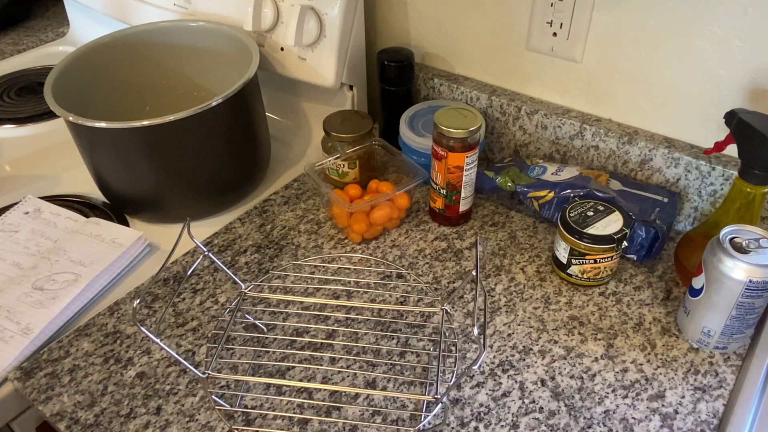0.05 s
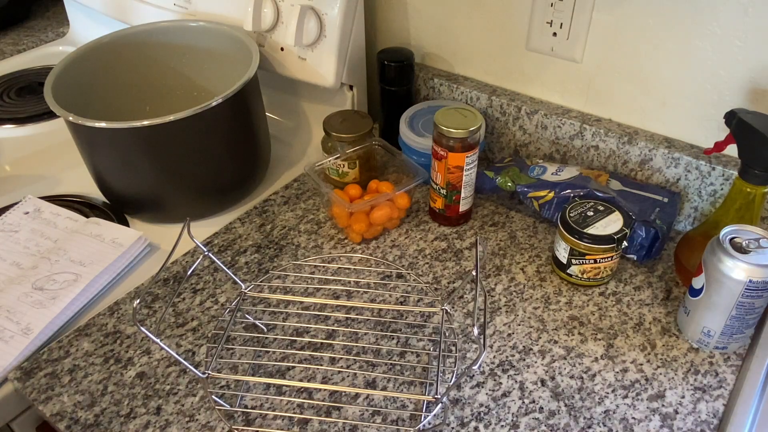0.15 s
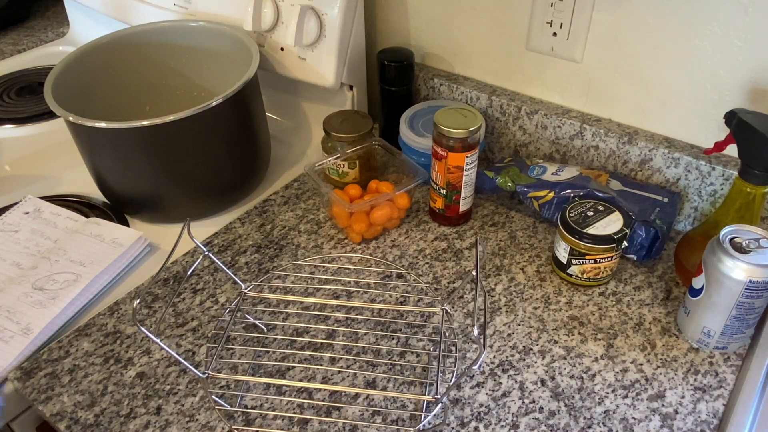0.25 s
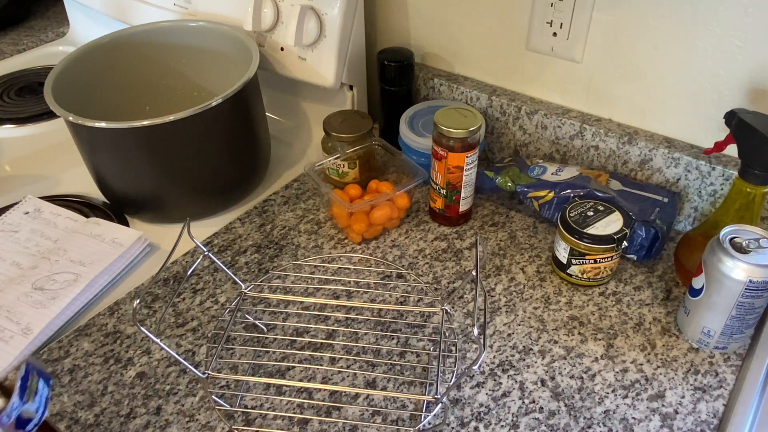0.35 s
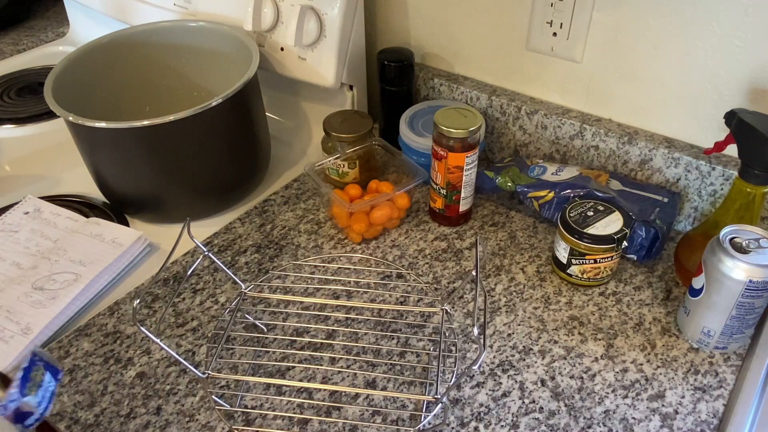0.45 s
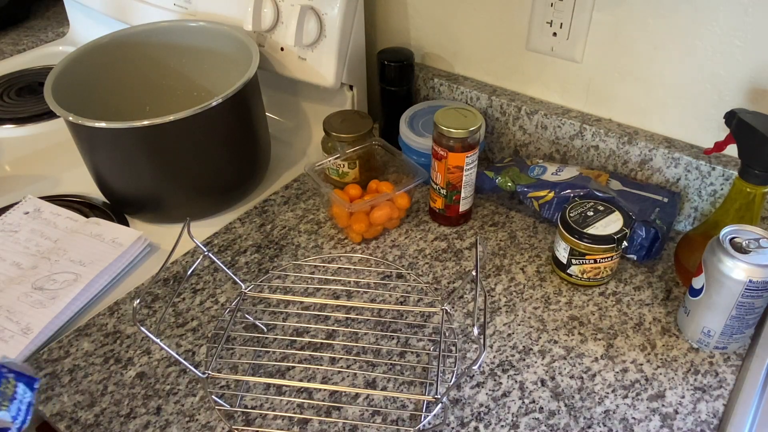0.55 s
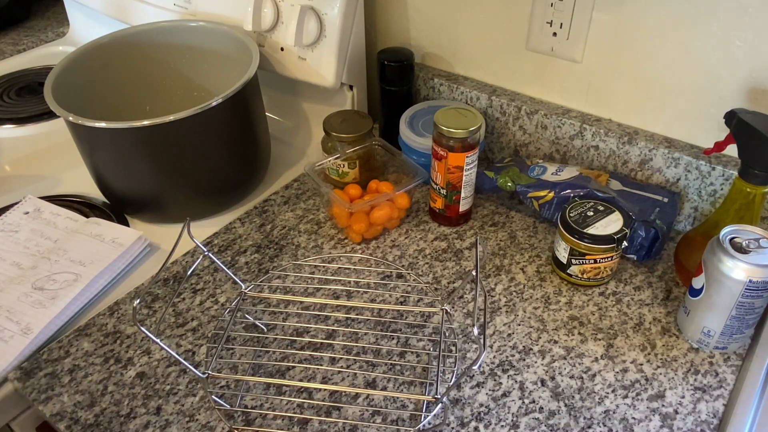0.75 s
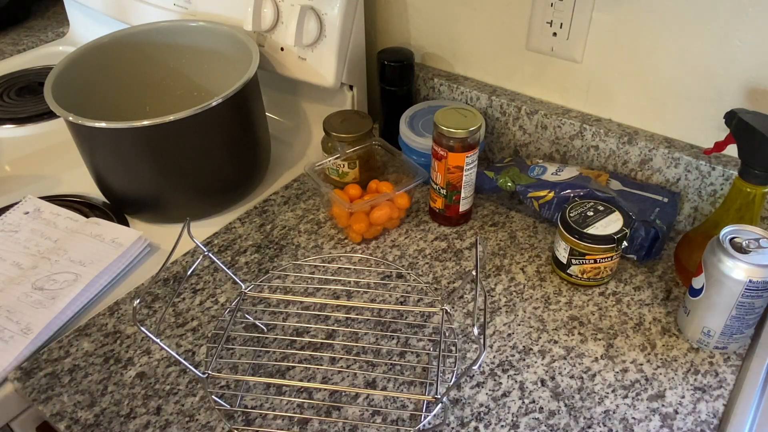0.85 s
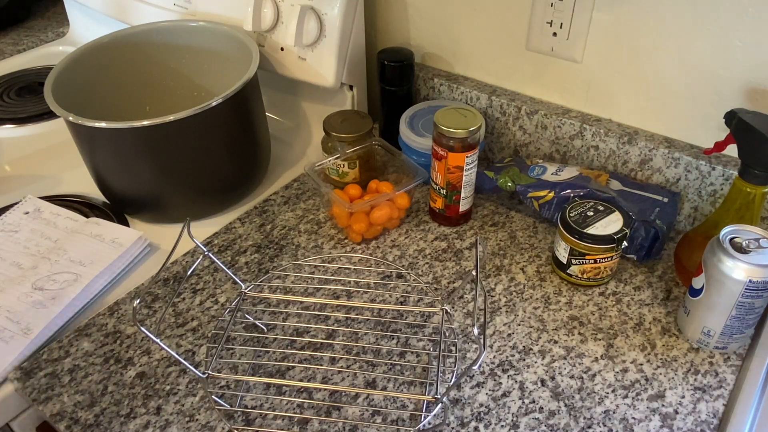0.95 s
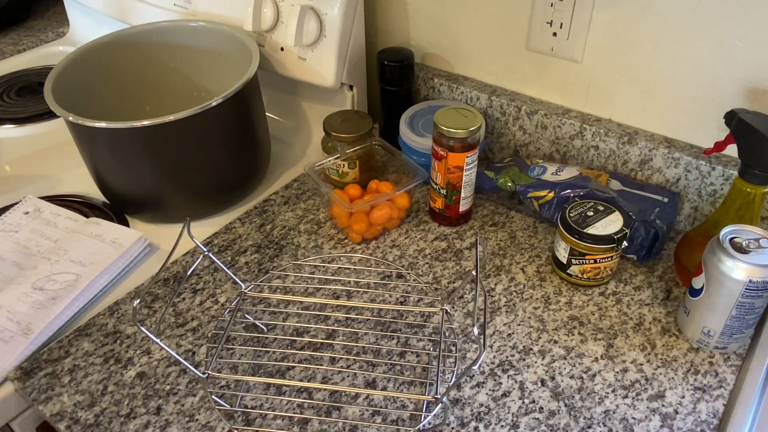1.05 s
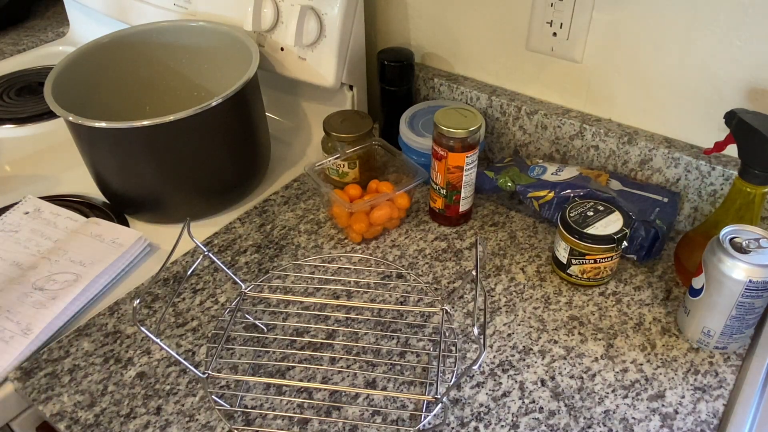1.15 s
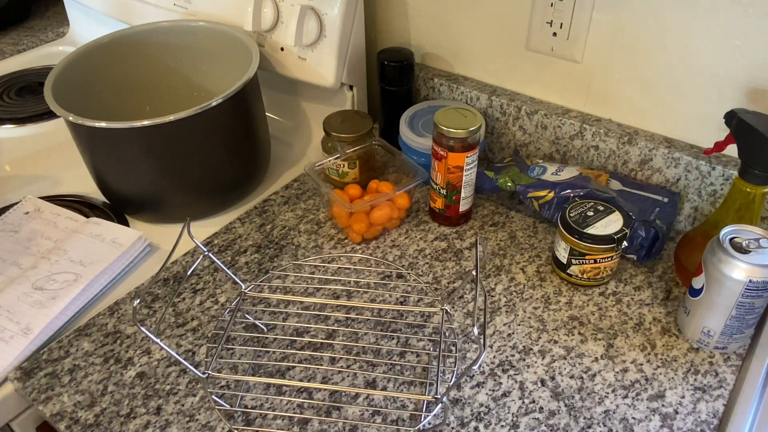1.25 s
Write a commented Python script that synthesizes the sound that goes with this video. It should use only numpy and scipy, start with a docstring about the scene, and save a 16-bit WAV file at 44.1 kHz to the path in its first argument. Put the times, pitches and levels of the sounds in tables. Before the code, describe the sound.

Aluminum foil is pulled off its roll from the start, a bright, fairly soft, uneven crackle with tiny snaps and low pops. Around 0.4 to 0.6 s it tightens and grows louder. At about 0.6 s it pops hard and rips, with a harsher rasp and brief box ring near 0.65 s. The sheet shivers until 0.8 s, then faint rustle and short room echo fade into quiet kitchen air by 1.3 s.

```python
"""In a quiet kitchen, aluminium foil is drawn off its roll: thousands of tiny clicks crackle in the sheet.
Single creases snap as short ringing bursts, patches buckle and the hand knocks with low pops, while a hard room
echoes. The sheet tightens, then rips across the cutter in a fast run of clicks, ending in a harder rasp. Box
and roll ring with a set of decaying tones, and the freed sheet shivers and settles to a faint rustle."""
import sys
import numpy as np
from scipy import signal
from scipy.fft import rfft, irfft
from scipy.io import wavfile

SR = 44100
rng = np.random.default_rng(int(sys.argv[2]) if len(sys.argv) > 2 else 0)


def dump(signal):
    """Clip the signal to [-1, 1] and save it as 16-bit WAV at the path in sys.argv[1]."""
    limited = np.clip(np.atleast_2d(signal).T, -1, 1)
    pcm = np.round(limited * 32767).astype(np.int16)
    wavfile.write(sys.argv[1], SR, pcm)


N = 57330  # length in samples

# Tone of the kitchen's quiet air. Each row: frequency in Hz, relative strength in dB per Hz.
AIR_COLOUR = [(30, -14.5), (70, -4), (130, -5.5), (380, 3.5), (600, -7.5), (900, -5.5), (1400, -9.5),
              (4000, -19), (8000, -34), (12000, -38)]
# Crackle while the foil is drawn out. Each row: time in seconds, relative level in dB.
PULL_LEVELS = [(0.0, -39), (0.01, -42), (0.018, -36.5), (0.05, -34.5), (0.076, -37), (0.136, -34.5),
               (0.184, -40), (0.202, -31), (0.22, -35), (0.3, -37), (0.33, -43.5), (0.366, -36),
               (0.38, -43), (0.41, -35)]
# Tone of the drawn sheet. Each row: frequency in Hz, relative strength in dB per Hz.
DRAWN_COLOUR = [(100, -36), (300, -15), (700, -8.5), (1100, -9), (1700, 1), (2500, -2.5), (3650, 2),
                (4400, -7), (5000, 0.5), (6400, -1.5), (8500, -5), (11500, -18)]
# Single creases that snap. Each row: start in seconds, pitch in Hz, relative level in dB,
# time to die away by 60 dB in seconds.
CREASE_SNAPS = [(0.0185, 1700, -38, 0.025), (0.0453, 1370, -28, 0.013), (0.0432, 4760, -32, 0.028),
                (0.14, 7100, -33.5, 0.031), (0.1955, 1200, -38, 0.11), (0.1985, 4880, -32, 0.025),
                (0.288, 1930, -35.5, 0.07), (0.435, 3470, -25.5, 0.12), (0.461, 1510, -20.5, 0.017),
                (0.468, 3590, -34.5, 0.053), (0.4785, 7170, -29, 0.014), (0.524, 3970, -28.5, 0.038),
                (0.56, 1603, -38.5, 0.039), (0.629, 1732, -15.5, .03), (0.835, 2650, -47.5, 0.11),
                (0.875, 5160, -54.5, 0.056), (0.932, 3750, -50, 0.045), (1.001, 2040, -51.5, 0.035),
                (1.061, 3670, -56, 0.035), (1.275, 7000, -70, 0.071)]
# Patches of the sheet that buckle, with a few low knocks of the hand (near 0.02, 0.17 and 0.32 s). # Each row:
# start in seconds, pitch in Hz, relative level in dB, # time for the pop to die away by 60 dB in seconds,
# amount of rough crumple from 0 to 1.
BUCKLES_AND_KNOCKS = [(0.023, 202, -36, .02, .4), (0.033, 700, -29, 0.02, .4), (0.044, 688, -31, .04, .5),
                      (0.101, 390, -28, 0.018, .5), (0.172, 117, -45.5, 0.028, .5), (0.183, 444, -33, 0.083, .2),
                      (0.197, 364, -31, 0.038, .5), (0.207, 196, -42.5, 0.052, .4),
                      (0.235, 790, -32.5, 0.026, .2), (0.2865, 753, -30, 0.032, 0.2),
                      (0.289, 260, -39, 0.059, .3), (0.324, 217, -35.5, 0.043, .6),
                      (0.348, 302, -35.5, 0.033, .4), (0.461, 250, -26.5, 0.036, .4),
                      (0.4615, 830, -27.5, 0.038, 0.24), (0.4641, 469, -19.5, 0.062, .15),
                      (0.496, 244, -31.5, .05, .3), (0.565, 383, -39, 0.13, .2), (0.589, 376, -11.5, 0.018, .08),
                      (0.6255, 680, -6, 0.012, .4), (0.6267, 209.7, -13, .022, .25),
                      (0.641, 485, -21, 0.051, .3), (0.678, 353, -30.5, 0.041, .3),
                      (0.803, 470, -36.5, 0.084, 0), (0.9771, 360, -34, 0.018, 0.18)]
# Crackle as the sheet is pulled tight over the cutter. Each row: time in seconds, relative level in dB.
TIGHTEN_LEVELS = [(0.395, -52), (0.425, -31.5), (0.436, -27), (0.455, -28), (0.48, -26.5), (0.52, -33),
                  (0.54, -31.5), (0.572, -27.5), (0.598, -35.5), (0.614, -36.5)]
# Tone of the taut sheet, used for the shiver too. Each row: frequency in Hz, relative strength in dB per Hz.
TAUT_COLOUR = [(100, -29.5), (300, -18), (700, -7), (1100, -11), (1650, -2), (2400, -2), (3500, -1.5),
               (4400, -3), (6400, -0.5), (8500, -6), (11500, -17)]
# Tone of the rip. Each row: frequency in Hz, relative strength in dB per Hz.
RIP_COLOUR = [(100, -19), (400, 1), (800, 0.5), (1200, -5), (1900, 2), (2800, -1.5), (3600, 0), (5500, -3),
              (8000, -5.5), (11500, -15.5)]
# Crackle of the freed sheet. Each row: time in seconds, relative level in dB.
SHIVER_LEVELS = [(0.62, -21), (0.68, -31), (0.72, -33.5), (0.785, -38.5), (0.82, -72), (0.86, -83)]
# Tones that box and roll ring with. Each row: pitch in Hz, relative level in dB,
# time to die away by 60 dB in seconds.
BOX_TONES = [(458, -2, .17), (1673, -8, .3), (1730, -6, .3), (1773, -5, .25), (1940, -2, .3),
             (1983, -2, .3), (2038, -1, .3), (2237, -5, .3), (2305, -5, .25), (2474, -3, .3),
             (2630, -4, .25), (2723, -6, .25), (2989, 1, .27)]
# Tone of the last rasp of the rip. Each row: frequency in Hz, relative strength in dB per Hz.
RASP_COLOUR = [(200, -18), (900, -26), (1400, -15.5), (1900, 1), (2900, 1.5), (3600, -9.5), (6000, -28.5),
               (11500, -28.5)]
# Faint rustle as the sheet is carried off. Each row: time in seconds, relative level in dB.
SETTLE_LEVELS = [(0.8, -41), (0.85, -59.5), (0.9, -57.5), (0.94, -54.5), (1.0, -57), (1.09, -63),
                 (1.16, -70.5), (1.25, -77), (1.28, -66.5), (1.3, -73)]
# Tone of the loose sheet. Each row: frequency in Hz, relative strength in dB per Hz.
LOOSE_COLOUR = [(100, -9.5), (400, -3), (600, -7.5), (850, -0.5), (1200, -6), (2200, -4.5), (3800, -3.5),
                (6000, -7), (8500, -18.5), (11500, -34)]

# T60 is the time a sound takes to die away by 60 dB.
AIR_DB = -68
CREASES_PER_S, CREASE_SPREAD_DB = 5000, 1.5
SHEET_T60_S, SHEET_RING_DB = 0.039, -1.5  # ring after each crease, its energy set against the click's
PULL_DB = -0.5
BRIGHT_HZ, BRIGHT_FULL_DB, DULLING = 6000, -35, 0.78  # below this level, treble loses DULLING dB more per dB
ROOM_DB, ROOM_GAP_S = -13.5, 0.011
ROOM_T60_LOW_S, ROOM_T60_MID_S, ROOM_T60_HIGH_S = 0.4, 0.44, 0.22
SNAP_WIDTH = 0.4  # width of one filter pass, as a share of the pitch
BUCKLE_RISE_S = 0.0011
CRUMPLE_LENGTH = 1.44  # the crumple lasts this many times as long as the pop
CRUMPLE_SPAN = 1.74  # the crumple reaches this factor below and above the pitch
TEETH_PER_S, TOOTH_JITTER = 1300, 0.3  # typical rate, and how uneven the gaps are
TOOTH_T60_S, TOOTH_RING_DB = 0.017, 8.5
RIP_S, RIP_LENGTH_S, RIP_RISE_S, RIP_T60_S, RIP_DB = 0.6155, 0.029, 0.0031, 0.27, -19
RIP_DULL_HZ, RIP_OPEN_S = 4940, 0.014  # the treble above this takes this long to come in
RASP_S, RASP_LENGTH_S, RASP_RISE_S, RASP_T60_S, RASP_DB = 0.647, 0.013, 0.0094, 0.089, -18.5
BOX_STRIKE_S, BOX_RISE_S, BOX_DB = 0.640, 0.004, -30.5
TOP_HZ = 11800  # the microphone hears little above this
CEILING = 0.42  # rounded peaks stay below this height


def undb(db):
    """Turn decibels into a gain."""
    return 10 ** (np.asarray(db) / 20)


def unit(x):
    """Scale to an rms (average strength) of 1."""
    return x / np.sqrt(np.mean(x ** 2))


def seconds():
    """The time of every sample."""
    return np.arange(N) / SR


def fade(age, t60):
    """Smooth dying away from age 0 on; full strength before that."""
    return np.exp(-np.log(1000) * np.maximum(age, 0) / t60)


def curve(rows):
    """Gain that follows the (seconds, dB) points and fades quickly outside them."""
    s, db = np.array(rows).T
    t = seconds()
    fade_in = fade(s[0] - t, 0.03)
    fade_out = fade(t - s[-1], 0.017)
    return undb(np.interp(t, s, db)) * fade_in * fade_out


def through(x, response):
    """Pass a sound through an impulse response (what one click would turn into)."""
    return signal.fftconvolve(x, response)[:N]


def lowpass(x, hz):
    """Keep the part below a frequency, without delaying it."""
    return signal.sosfiltfilt(signal.butter(2, hz, fs=SR, output="sos"), x)


def colour(x, points):
    """Give a sound the tone of the (Hz, dB) points, at unit energy below TOP_HZ."""
    hz, db = np.array(points).T
    size = 2048
    f = np.maximum(np.fft.rfftfreq(size, 1 / SR), 1)
    gain = undb(np.interp(np.log(f), np.log(hz), db))
    # Folding the cepstrum makes a filter that answers at once and never before its input.
    cepstrum = irfft(np.log(gain))
    cepstrum[1:size // 2] *= 2
    cepstrum[size // 2 + 1:] = 0
    response = irfft(np.exp(rfft(cepstrum)))
    energy = np.mean(gain ** 2 * (f < TOP_HZ))
    return through(x, response / np.sqrt(energy))


def ringing(clicks, t60, ring_db):
    """Thin metal shimmers after each click: noise that follows the clicks' dying energy."""
    tail = fade(seconds(), t60)
    power = np.maximum(through(clicks ** 2, tail / tail.sum()), 0)
    return clicks + undb(ring_db) * np.sqrt(power) * rng.standard_normal(N)


def air():
    """The quiet air of the kitchen: steady, coloured noise."""
    return undb(AIR_DB) * colour(rng.standard_normal(N), AIR_COLOUR)


def creases():
    """Tiny folds click at random moments, mostly weak and a few strong, each with a short ring."""
    sizes = undb(CREASE_SPREAD_DB * np.minimum(rng.exponential(size=N), 4.5))
    happens = rng.random(N) < CREASES_PER_S / SR
    clicks = happens * sizes * rng.choice([-1, 1], N)
    return unit(ringing(clicks, SHEET_T60_S, SHEET_RING_DB))


def rustle():
    """The sheet crackles as it is drawn (duller when the pull slackens), tightens, shivers and settles."""
    pull = curve(PULL_LEVELS)
    drawn = colour(creases() * undb(PULL_DB) * pull, DRAWN_COLOUR)
    dull = lowpass(drawn, BRIGHT_HZ)
    brightness = np.minimum(pull / undb(BRIGHT_FULL_DB), 1) ** DULLING
    drawn = dull + (drawn - dull) * brightness
    taut = colour(creases() * (curve(TIGHTEN_LEVELS) + curve(SHIVER_LEVELS)), TAUT_COLOUR)
    loose = colour(creases() * curve(SETTLE_LEVELS), LOOSE_COLOUR)
    return drawn + taut + loose


def room(x):
    """A small hard kitchen echoes the foil as a dying wash of noise; the treble dies first."""
    t, noise = seconds(), rng.standard_normal(N)
    low, below = (signal.sosfiltfilt(signal.butter(3, hz, fs=SR, output="sos"), noise)
                  for hz in (900, 6000))
    tail = low * fade(t, ROOM_T60_LOW_S)
    tail += (below - low) * fade(t, ROOM_T60_MID_S)
    tail += (noise - below) * fade(t, ROOM_T60_HIGH_S)
    return through(x, unit(tail * (t > ROOM_GAP_S)) / np.sqrt(N))


def snaps():
    """Sharp creases stand out of the rustle, each a short burst of noise ringing one facet of the foil."""
    out = np.zeros(N)
    for s, hz, db, t60 in CREASE_SNAPS:
        age = seconds() - s
        burst = rng.standard_normal(N) * (age > 0) * fade(age, t60)
        facet = signal.iirpeak(hz, 1 / SNAP_WIDTH, fs=SR)
        # Two passes make the pitch clearer.
        ring = signal.lfilter(*facet, signal.lfilter(*facet, burst))
        # The ring gets the strength of its burst.
        out += undb(db) * unit(ring) * np.std(burst)
    return out


def buckles():
    """Large patches flip over and the hand knocks a few times, each a low pop of a dying sine wave with rough,
    noisy crumple round it."""
    out = np.zeros(N)
    for s, hz, db, t60, rough in BUCKLES_AND_KNOCKS:
        age = np.maximum(seconds() - s, 0)
        pop = fade(age, t60) * np.sin(2 * np.pi * hz * age)
        limits = [hz / CRUMPLE_SPAN, hz * CRUMPLE_SPAN]
        band = signal.butter(2, limits, "band", fs=SR, output="sos")
        crumple = unit(signal.sosfilt(band, rng.standard_normal(N)))
        crumple = rough * crumple * fade(age, t60 * CRUMPLE_LENGTH)
        rise = 1 - np.exp(-(age / BUCKLE_RISE_S) ** 2)
        out += undb(db) * rise * (pop + crumple)
    return out


def teeth(start_s, length_s, rise_s, t60):
    """The foil gives way tooth by tooth along the cutter, in an uneven run of equal clicks."""
    gaps = np.exp(TOOTH_JITTER * rng.standard_normal(N // 20))
    at = (np.cumsum(gaps) * SR / TEETH_PER_S).astype(int)
    clicks = np.zeros(N)
    clicks[at[at < N]] = 1
    run = unit(ringing(clicks, TOOTH_T60_S, TOOTH_RING_DB))
    # Only the stretch from start_s on is let through.
    age = seconds() - start_s
    return run * np.clip(age / rise_s, 0, 1) * fade(age - length_s, t60)


def tear():
    """A broad rip that brightens, then a harder rasp as the last of the edge lets go."""
    rip = undb(RIP_DB) * colour(teeth(RIP_S, RIP_LENGTH_S, RIP_RISE_S, RIP_T60_S), RIP_COLOUR)
    dull = lowpass(rip, RIP_DULL_HZ)
    opening = np.clip((seconds() - RIP_S) / RIP_OPEN_S, 0, 1)
    rip = dull + (rip - dull) * opening
    rasp = colour(teeth(RASP_S, RASP_LENGTH_S, RASP_RISE_S, RASP_T60_S), RASP_COLOUR)
    return rip + undb(RASP_DB) * rasp


def box():
    """Cutter, box and roll ring briefly as the tension leaves them: a sum of dying sine waves."""
    age = np.maximum(seconds() - BOX_STRIKE_S, 0)
    tones = np.zeros(N)
    for hz, db, t60 in BOX_TONES:
        wave = np.sin(2 * np.pi * (hz * age + rng.random()))
        tones += undb(db) * fade(age, t60) * wave
    return undb(BOX_DB) * np.minimum(age / BOX_RISE_S, 1) * tones


def scene():
    """The foil and its box, their echo and the quiet air of the kitchen."""
    foil = rustle() + snaps() + buckles() + tear() + box()
    return (air() + foil + undb(ROOM_DB) * room(foil))[None]


def record(dry):
    """The microphone cuts the top, rounds the highest peaks and thins the deep bass."""
    top = signal.ellip(12, 0.2, 80, TOP_HZ, fs=SR, output="sos")
    heard = signal.sosfilt(top, dry)
    rounded = heard / (1 + (heard / CEILING) ** 4) ** 0.25
    thin = signal.sosfilt(signal.butter(3, 105, "high", fs=SR, output="sos"), rounded)
    # Rounding adds new treble, so the top is cut again.
    return signal.sosfilt(top, thin)


dry = scene()
out = record(dry)
dump(out)
```